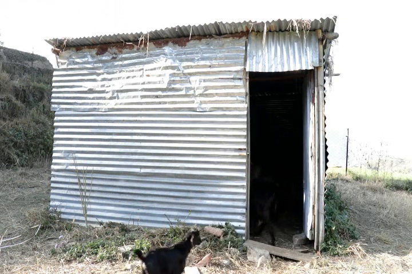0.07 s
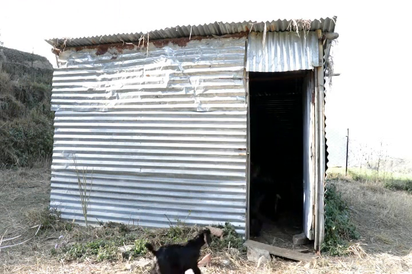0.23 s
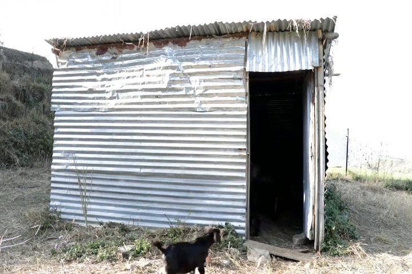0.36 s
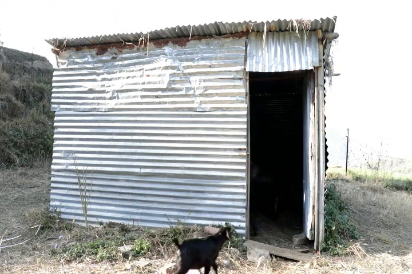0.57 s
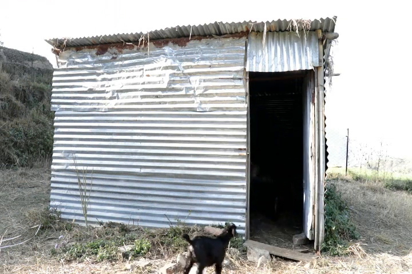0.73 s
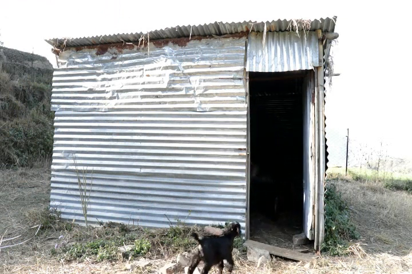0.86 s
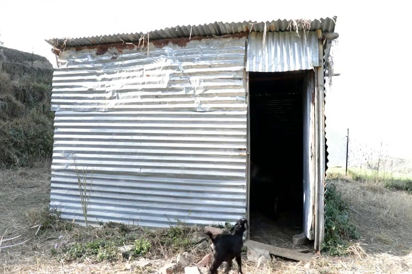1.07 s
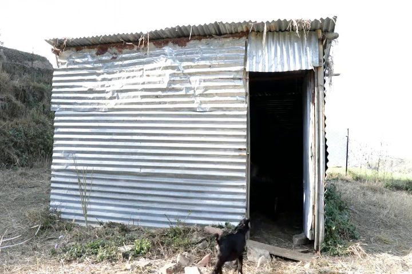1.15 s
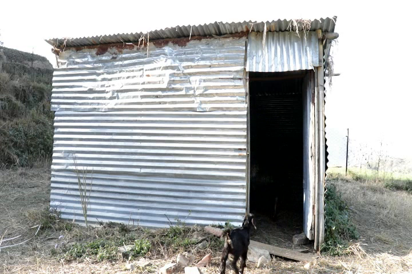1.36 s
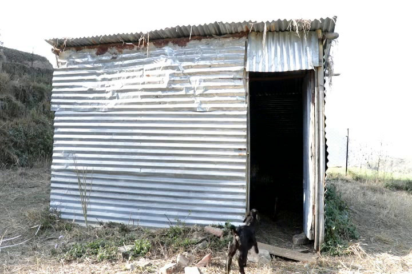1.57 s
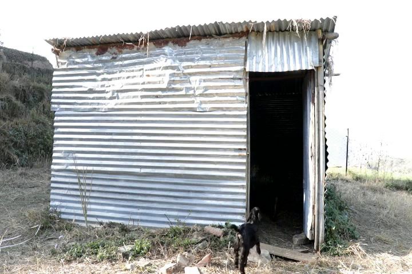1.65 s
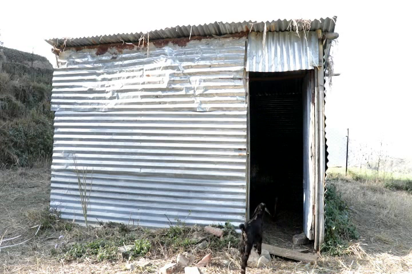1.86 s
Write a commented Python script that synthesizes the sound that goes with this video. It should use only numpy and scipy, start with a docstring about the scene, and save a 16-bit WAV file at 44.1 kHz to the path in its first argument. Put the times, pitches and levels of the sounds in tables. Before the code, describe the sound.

After a soft hoof thud, corrugated metal is struck once, very loud, with a dense clang and long low ring; then faint stalk snaps, hoof knocks and scrapes follow in quiet open air, mono microphone.

```python
"""A sheet-metal shed takes one hard bang: a blow and crack, a dense clang of filtered noise that darkens
as it dies, decaying sines for the panel modes that stand out, and a low beating hum of two big panels.
Small goats walk about: stalks snap and grass rustles (noise), hooves knock on boards and stones (rough tones),
thud on soil (low sines), scrape (gliding narrow noise), shuffle and tread (noise), over soft outdoor air."""
import sys
import numpy as np
from scipy import signal
from scipy.fft import rfft, irfft, next_fast_len
from scipy.io import wavfile
from scipy.ndimage import uniform_filter1d

SR = 44100
rng = np.random.default_rng(int(sys.argv[2]) if len(sys.argv) > 2 else 0)


def field_ratio(decibels):
    """Amplitude ratio for a level in dB (20 dB per decade); scalars and array-likes work."""
    return 10 ** (np.asarray(decibels, dtype=float) / 20)


def dump(signal):
    """Clip the signal to [-1, 1] and save it as 16-bit WAV at the path in sys.argv[1]."""
    limited = np.clip(np.atleast_2d(signal).T, -1, 1)
    pcm = np.round(limited * 32767).astype(np.int16)
    wavfile.write(sys.argv[1], SR, pcm)


N = 83790
BANG_S = 0.2255


def unit(x):
    """x at rms 1."""
    return x / np.sqrt(np.mean(x ** 2) + 1e-20)


def along(points, hz):
    """(f/Hz, value) points interpolated on a log frequency axis."""
    f, v = np.transpose(points)
    return np.interp(np.log(hz + 1), np.log(f + 1), v)


def curve(rows):
    """One value per sample from (t/s, value) rows."""
    return np.interp(np.arange(N) / SR, *np.transpose(rows))


def filtered(x, response):
    """x times a response of frequency."""
    m = next_fast_len(N + SR // 4)
    return irfft(rfft(x, m) * response(np.fft.rfftfreq(m, 1 / SR)), m)[..., :N]


def noise(response):
    """White noise through a response of frequency, at rms 1."""
    return unit(filtered(rng.standard_normal(N), response))


def since(s):
    """Seconds since a moment, zero before it."""
    return np.maximum(np.arange(N) / SR - s, 0)


def decay(s, t60_s, rise_s):
    """Envelope that builds up at s with time constant rise_s and dies away."""
    t = since(s)
    return (1 - np.exp(-t / rise_s)) * field_ratio(-60 * t / t60_s)


def rush(spectrum, patchy_db, grain_db):
    """Noise of rms 1 with time-frequency patches of random gain and grainy level."""
    grains = field_ratio(grain_db * unit(uniform_filter1d(rng.standard_normal(N), size=60)))
    z = signal.stft(grains * rng.standard_normal(N), nperseg=512)[2]
    field = uniform_filter1d(rng.standard_normal(z.shape), size=8, axis=0)
    field = uniform_filter1d(field, size=6, axis=1)
    x = signal.istft(z * field_ratio(patchy_db * unit(field)), nperseg=512)[1][:N]
    return unit(filtered(x, lambda hz: field_ratio(along(spectrum, hz))))


def blow():
    """First contact: a short dent of the sheet, one damped cosine."""
    t = since(BANG_S)
    return -field_ratio(-6.5) * decay(BANG_S, 0.028, rise_s=0.00012) * np.cos(2 * np.pi * 780 * (t - 0.0002))


def crack():
    """Crack of the blow: a few ms of noise, low-passed near 5 kHz."""
    burst = noise(lambda hz: 1 / (1 + (hz / 5000) ** 4))
    return field_ratio(-13.5) * decay(BANG_S, 0.0073, rise_s=0.0001) * burst


def strike(hz, t60_s):
    """Envelope of a sheet mode: the bang, then the sheet slaps its frame, feeding the treble."""
    # Time constant of the build-up: f/Hz, rise/s
    clang_rise = [(100, 0.0067), (300, 0.014), (700, 0.0015), (2500, 0.0028), (5000, 0.003),
                  (12000, 0.00047)]
    rebound_delay_s, rebound_db, rebound_hz = 0.011, 4.5, 3200
    # weight of the slap against the bang, greatest at rebound_hz
    slap = field_ratio(rebound_db) / (1 + np.log(hz / rebound_hz) ** 2 / 0.49)
    first = decay(BANG_S, t60_s, along(clang_rise, hz))
    rebound = decay(BANG_S + rebound_delay_s, t60_s, rise_s=0.002)
    return (first + slap * rebound) / (1 + slap)


def clang():
    """The sheet's countless modes as noise in log-spaced bands, each dying at its own rate."""
    # Relative spectrum of the dense modes before decay: f/Hz, density/dB per Hz
    clang_tone = [(35, -59), (60, -19), (150, -13.5), (210, -6), (400, -8), (560, -6), (720, -6),
                  (980, -11), (1600, -8), (2470, -7.5), (3500, -10), (5100, -11.5), (5500, -21),
                  (8000, -23.5), (11200, -29.5), (14500, -40), (15800, -44)]
    # Decay of the modes: f/Hz, t60/s
    clang_t60 = [(80, 2.3), (210, 1.39), (560, 1.2), (1470, 0.55), (3880, 0.31), (10200, 0.25)]
    centres_hz = np.geomspace(50, 16000, num=26)
    step = np.log(centres_hz[1] / centres_hz[0])

    def triangles(hz):
        return np.clip(1 - abs(np.log((hz + 1) / centres_hz[:, None])) / step, 0, 1)

    bands = filtered(noise(lambda hz: field_ratio(along(clang_tone, hz))), triangles)
    ringing = sum(band * strike(hz, along(clang_t60, hz)) for band, hz in zip(bands, centres_hz))
    return field_ratio(-15) * ringing


def panels():
    """Panel modes that stand out of the clang: decaying sines of alternating sign."""
    # Modes: f/Hz, relative level/dB, t60/s
    panel_modes = [(192.2, -9, 1.54), (221, -6.5, 1.24), (263, -23, 0.58), (294.7, -2, 1.24),
                   (326.2, -11, 1.04), (373.8, -4.5, 0.9), (391.5, -6.5, 0.46), (499.5, -12, 1.2),
                   (570, -9.5, 1.2), (624, -11.5, 0.91), (660, -5, 0.88), (697, 1.5, 0.8), (721, 1.5, 0.73),
                   (742, -10, 0.64), (765.6, 0.5, .5), (874, -24, 0.62), (915, -5, 0.67), (1034, -8, 0.31),
                   (1147, 0, 0.35), (1655, -4.5, 0.4), (1884, -8.5, .35), (1990, -6.5, 0.42),
                   (2145, -2, 0.4), (2784, 2.5, 0.23), (3629, -9, 0.31), (4378, -3, 0.18)]
    t = since(BANG_S)
    out = np.zeros(N)
    for k, (hz, db, t60_s) in enumerate(panel_modes):
        out += (-1) ** k * field_ratio(db) * strike(hz, t60_s) * np.sin(2 * np.pi * hz * t)
    return field_ratio(-25.5) * out


def hum():
    """Two wall panels of nearly the same pitch, starting in antiphase and beating."""
    centre_hz, beat_hz, each_db, t60_s = 245.6, 4.1, -32.5, 2.19
    t = since(BANG_S)
    # the product equals two sines beat_hz apart
    pair = 2 * np.sin(np.pi * beat_hz * t) * np.cos(2 * np.pi * centre_hz * t)
    return field_ratio(each_db) * decay(BANG_S, t60_s, rise_s=0.011) * pair


def bang():
    """The blow dents the sheet; its modes ring and die by pitch, the big panels last."""
    return hum() + blow() + crack() + clang() + panels()


def snaps():
    """Stalks snapping: each a short burst of noise around its own pitch."""
    # Snaps: t/s, level/dB before the trim, centre f/Hz, t60/s
    stalks = [(.441, -31.5, 5650, .01), (0.449, -36, 5960, .01), (.524, -35, 6500, 0.012),
              (0.5623, -36, 10000, .006), (0.5796, -35, 8100, 0.0056), (.609, -42, 8000, .008),
              (0.6384, -35, 8700, 0.012), (0.693, -36, 6000, 0.011), (0.7284, -45, 9240, 0.038),
              (0.784, -37, 3650, 0.046), (0.9003, -35, 10010, 0.019), (1.0096, -39, 10000, 0.065),
              (1.065, -42, 14000, 0.013), (1.094, -43, 9100, .02), (1.829, -45, 8930, 0.014)]
    trim_db, q = -3.5, 2
    out = np.zeros(N)
    for s, db, centre_hz, t60_s in stalks:
        width_hz = centre_hz / q
        burst = noise(lambda f: 1j * f * width_hz / (centre_hz ** 2 - f * f + 1j * f * width_hz))
        out += field_ratio(db + trim_db) * decay(s, t60_s, rise_s=0.00048) * burst
    return out


def knocks():
    """Hooves knocking small boards and stones: a roughened ring over a dull puff of dirt."""
    # Knocks: t/s, ring level/dB, f/Hz, t60/s
    hits = [(.004, -45, 1310, 0.069), (0.043, -43.5, 1244, 0.046), (.598, -48, 716, 0.077),
            (.732, -45.5, 1157, 0.072), (.734, -42.5, 1743, 0.06), (.902, -37, 1152, 0.094),
            (.925, -34.5, 1172, 0.06), (1.017, -47.5, 2225, 0.17), (1.095, -44.5, 766, 0.13),
            (1.195, -41, 598, 0.045), (1.293, -49.5, 1405, .06), (1.325, -47.5, 1380, 0.14),
            (1.516, -43.5, 1410, 0.077), (1.518, -42.5, 616, 0.033), (1.521, -40.5, 2180, .04),
            (1.59, -46, 1343, 0.075), (1.744, -43, 1476, 0.077), (1.738, -41.5, 393, 0.029)]
    roughness = 0.35  # noise rms against sine peak
    puff_db, puff_t60_s, puff_hz = -5.5, 0.057, 1970  # level relative to the ring
    out = np.zeros(N)
    for s, db, hz, t60_s in hits:
        rough = noise(lambda f: 1 / (1 + ((f - hz) / (0.1 * hz)) ** 2))
        puff = noise(lambda f: f / (f + 400) / (1 + (f / puff_hz) ** 2))
        ring = np.sin(2 * np.pi * hz * since(s)) + roughness * rough
        out += field_ratio(db) * decay(s, t60_s, rise_s=0.0022) * ring
        out += field_ratio(db + puff_db) * decay(s, puff_t60_s, rise_s=0.00086) * puff
    return out


def thuds():
    """Hooves landing on soil: each a low damped sine."""
    # Landings: t/s, level/dB, f/Hz, t60/s
    landings = [(0.072, -26, 122, 0.052), (.088, -32.5, 263, 0.043), (0.106, -36.5, 137, 0.14),
                (1.086, -43, 125, 0.16), (1.409, -52, 204, 0.041)]
    out = np.zeros(N)
    for s, db, hz, t60_s in landings:
        out += field_ratio(db) * decay(s, t60_s, rise_s=0.0032) * np.sin(2 * np.pi * hz * since(s))
    return out


def scrapes():
    """Narrow rough noise whose centre slides down, then holds until the hoof stops."""
    # Scrapes: t/s, level/dB, start f/Hz, end f/Hz, t60/s
    strokes = [(1.475, -47.5, 2975, 2250, 0.43), (1.74, -40.5, 3500, 3064, 0.25),
               (1.741, -51.5, 5010, 4580, .1)]
    # Gaussian half-width of each scrape: f/Hz
    half_widths_hz = [420, 1090, 1200]
    # Stop of each scrape after its start: t/s
    stops_s = [0.048, 0.12, .05]
    glide_s, fade_s = 0.04, 0.01
    out = np.zeros(N)
    for (s, db, start_hz, end_hz, t60_s), wide_hz, stop_s in zip(strokes, half_widths_hz, stops_s):
        hz = end_hz + (start_hz - end_hz) * np.clip(1 - since(s) / glide_s, 0, 1)
        slow = unit(filtered(rng.standard_normal((2, N)), lambda f: np.exp(-(f / wide_hz) ** 2)))
        phase = 2 * np.pi * np.cumsum(hz) / SR
        carried = slow[0] * np.cos(phase) + slow[1] * np.sin(phase)
        fade = np.clip((stop_s - since(s)) / fade_s, 0, 1)
        out += field_ratio(db) * decay(s, t60_s, rise_s=0.0049) * fade * carried
    return out


def grass():
    """Dry grass rustling under the goats: bright patchy noise on a level curve."""
    # Level, in two runs: t/s, level/dB
    rustle_runs = [
        [(0.0, -51.5), (0.066, -51), (0.082, -48), (0.152, -53.5), (0.172, -63), (0.186, -57), (0.21, -67)],
        [(0.4, -56), (0.432, -66), (0.444, -55.5), (0.474, -62), (0.528, -51.5), (0.546, -67), (0.65, -53.5),
         (0.834, -55.5), (0.872, -66), (0.9, -51), (0.988, -61.5), (1.014, -52.5), (1.05, -61), (1.114, -51),
         (1.288, -53), (1.326, -48.5), (1.452, -60.5), (1.694, -73), (1.828, -61), (1.9, -65)],
    ]
    # Relative spectrum: f/Hz, density/dB per Hz
    rustle_tone = [(1470, -17), (2500, -1.5), (3430, -4), (4490, -3), (5230, -4.5), (9980, -3.5),
                   (14200, -4), (15700, -18.5)]
    return field_ratio(curve(np.vstack(rustle_runs))) * rush(rustle_tone, patchy_db=1.5, grain_db=1.0)


def shuffle():
    """Hooves shuffling on loose ground: grainy low-mid noise on a level curve."""
    # Level, in two runs: t/s, level/dB
    shuffle_runs = [
        [(0.0, -44.5), (0.012, -48), (0.074, -53.5), (0.082, -58), (0.09, -58), (0.112, -61), (0.124, -54),
         (0.156, -49.5), (0.164, -78), (0.168, -56), (0.19, -62), (0.2, -57)],
        [(0.95, -58.5), (1.028, -58.5), (1.172, -62), (1.198, -49.5), (1.288, -57.5), (1.294, -52),
         (1.364, -50), (1.404, -75), (1.528, -45), (1.72, -70.5), (1.742, -44.5), (1.82, -69), (1.892, -91),
         (1.9, -39)],
    ]
    # Relative spectrum: f/Hz, density/dB per Hz
    shuffle_tone = [(150, -7), (250, -13), (305, -10), (479, -7.5), (875, -13), (1360, -10.5),
                    (4000, -26.5), (5200, -67), (8800, -120)]
    return field_ratio(curve(np.vstack(shuffle_runs))) * rush(shuffle_tone, patchy_db=0.5, grain_db=2.5)


def tread():
    """Dull tread carried by the ground: low noise on a level curve."""
    # Level, in two runs: t/s, level/dB before the trim
    tread_runs = [
        [(0.0, -56), (0.016, -61), (0.05, -65), (0.062, -51), (0.078, -47.5), (0.164, -52), (0.2, -49.5)],
        [(0.92, -48.5), (0.93, -54), (1.122, -47), (1.152, -53), (1.344, -51), (1.366, -57), (1.424, -53),
         (1.438, -58), (1.508, -48.5), (1.574, -75), (1.596, -46), (1.68, -58), (1.744, -50.5), (1.9, -62)],
    ]
    # Relative spectrum: f/Hz, density/dB per Hz
    tread_tone = [(15, -36), (25, -3), (193, -4), (239, -0.5), (303, -7.5), (500, -4.5), (650, -37),
                  (1100, -120)]
    trim_db = -3.0
    return field_ratio(curve(np.vstack(tread_runs)) + trim_db) * rush(tread_tone, patchy_db=2.0, grain_db=0.6)


def air():
    """Soft outdoor air: noise of steady mean level, strongest in the bass."""
    # Relative spectrum: f/Hz, density/dB per Hz
    air_tone = [(12, -42), (20, -4.5), (133, -1.5), (385, -10.5), (430, -16.5), (618, -9.5), (966, -14),
                (1390, -15.5), (2430, -22), (3030, -23), (15700, -30)]
    return field_ratio(-50) * rush(air_tone, patchy_db=0.5, grain_db=0.5)


def scene():
    """All sources at one microphone."""
    goats = snaps() + knocks() + thuds() + scrapes() + grass() + shuffle() + tread()
    return (bang() + goats + air())[None]


def low_pass(x):
    """Removes everything above the highest recorded frequency."""
    return signal.sosfilt(signal.butter(12, 15870, fs=SR, output="sos"), x)


def record(dry):
    """Sharp band limit: nothing passes from top_hz up."""
    top_hz = 15850
    mix = filtered(dry, lambda hz: hz < top_hz)
    return low_pass(mix)


dry = scene()
out = record(dry)
dump(out)
```